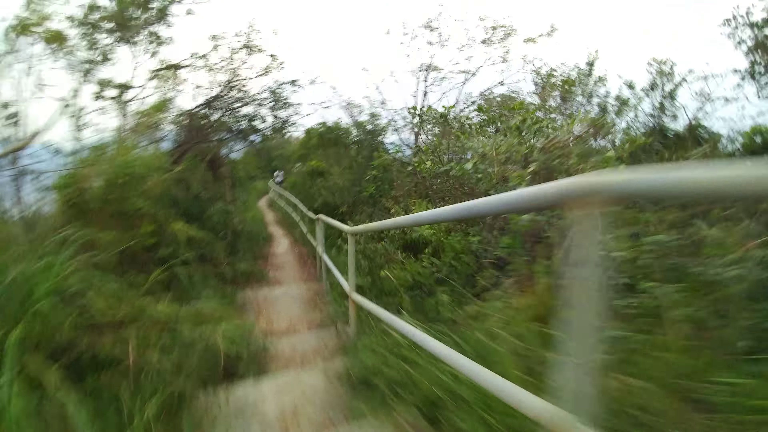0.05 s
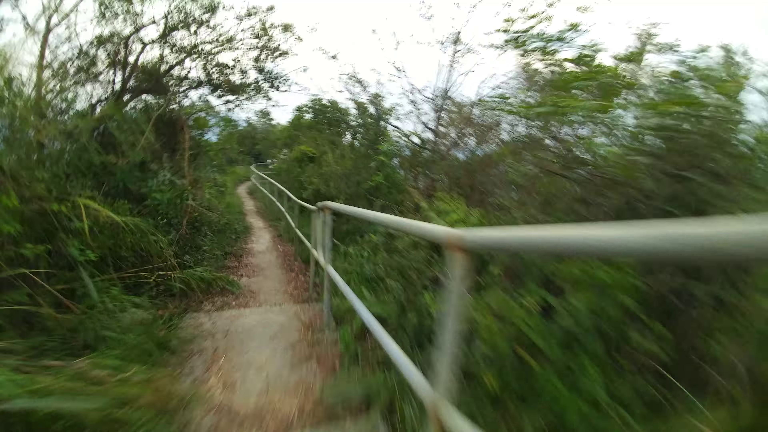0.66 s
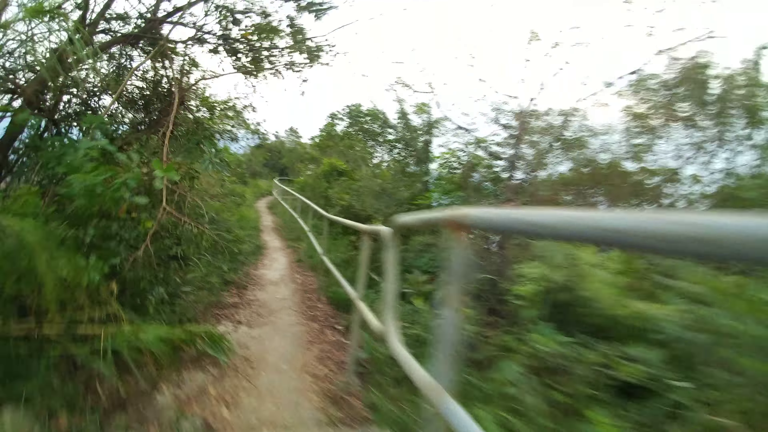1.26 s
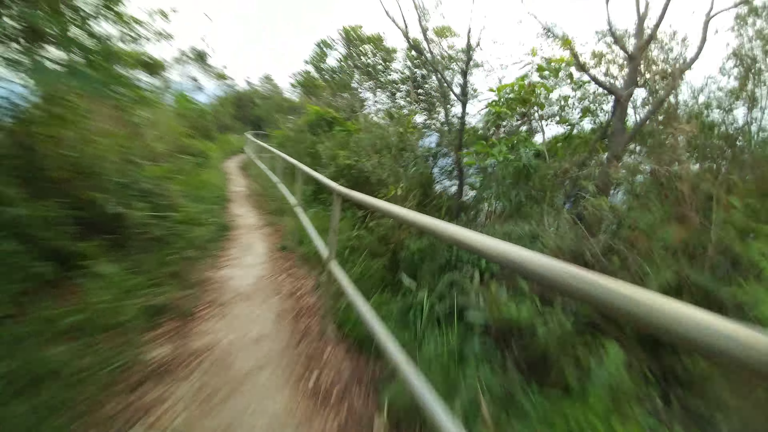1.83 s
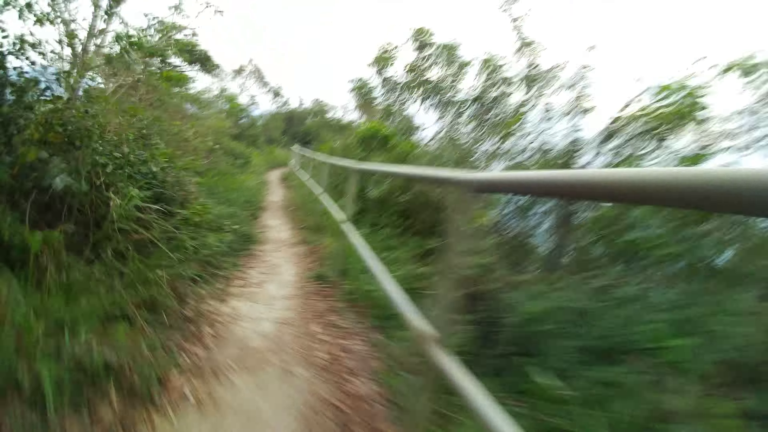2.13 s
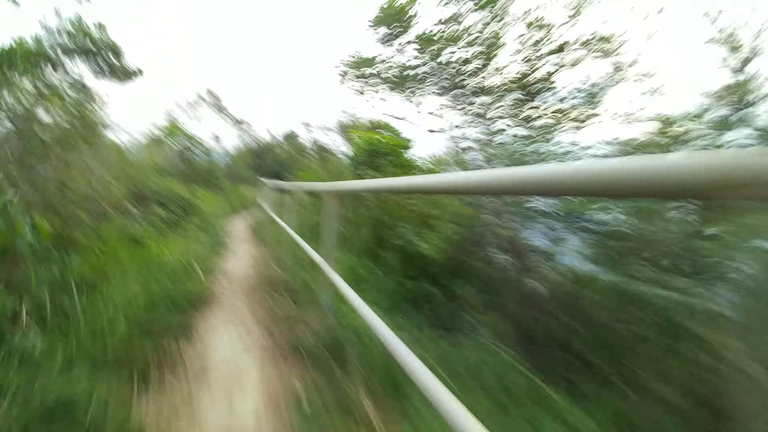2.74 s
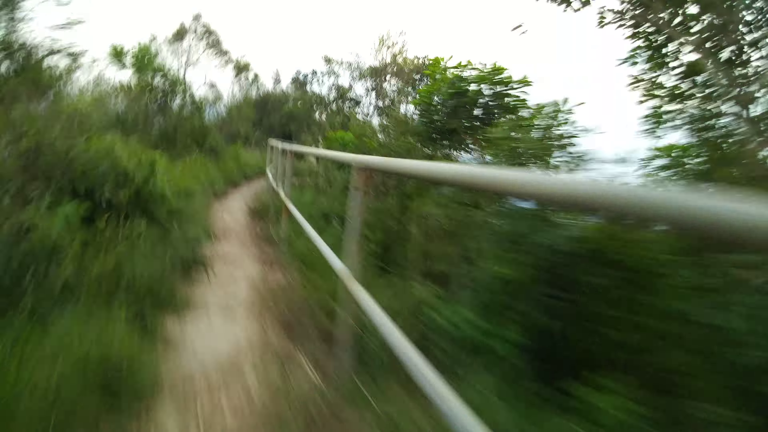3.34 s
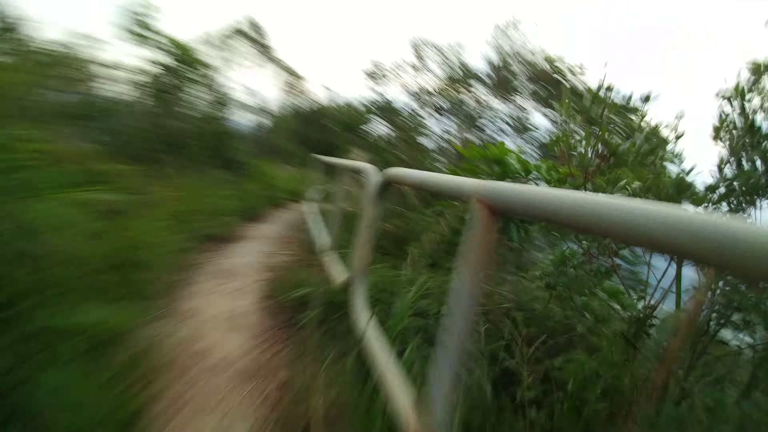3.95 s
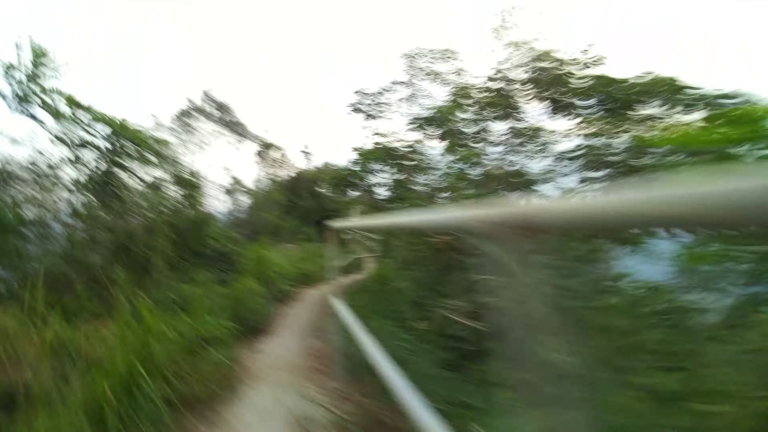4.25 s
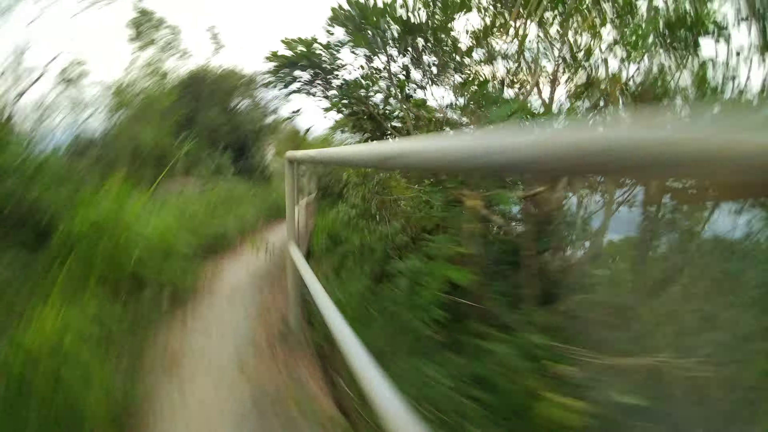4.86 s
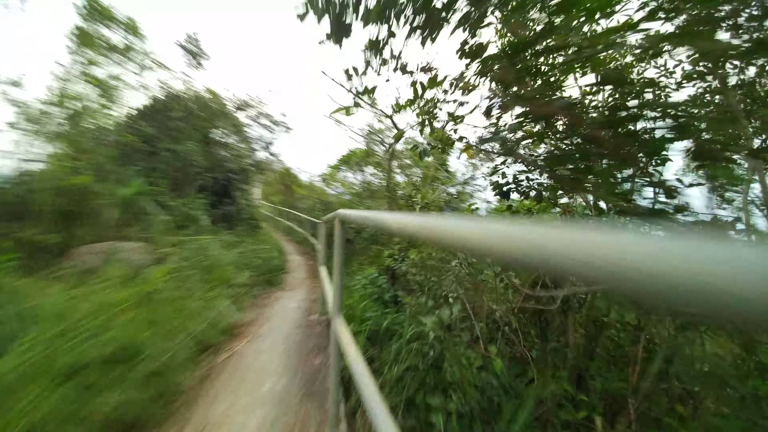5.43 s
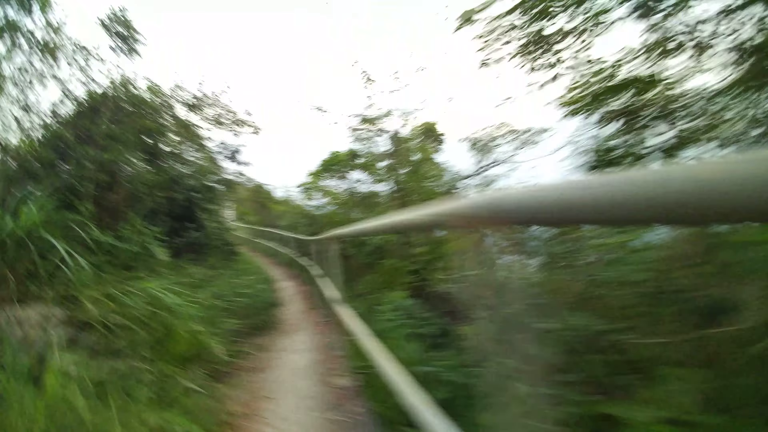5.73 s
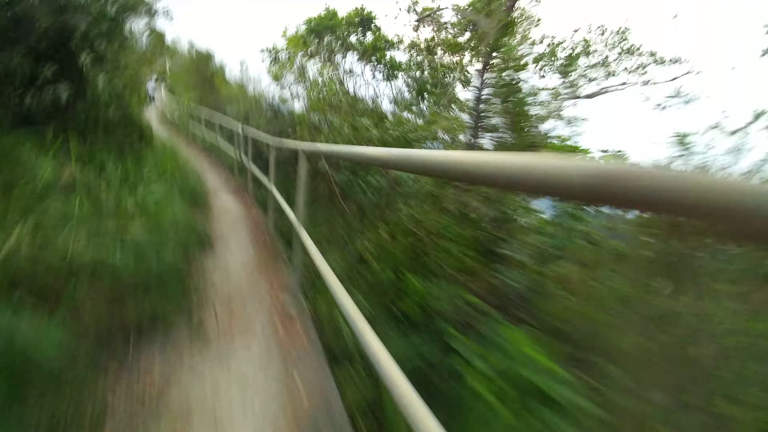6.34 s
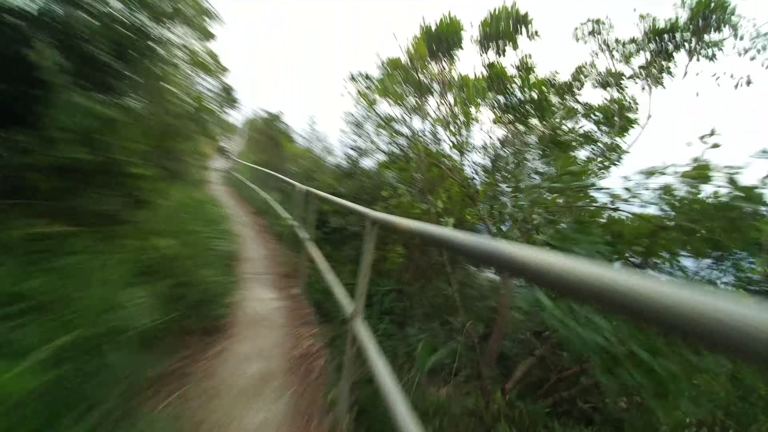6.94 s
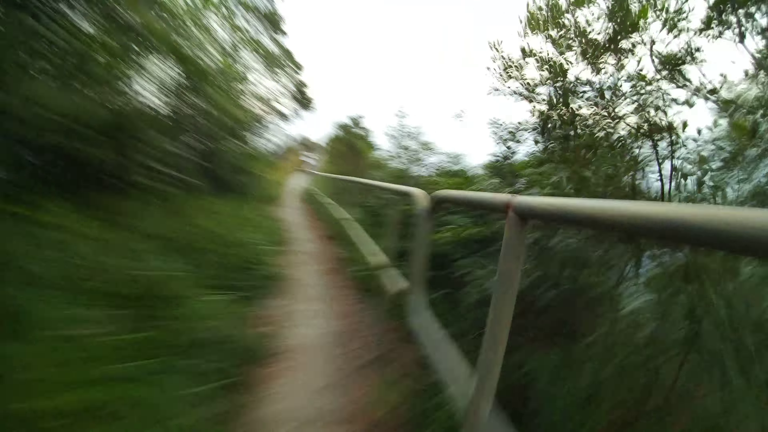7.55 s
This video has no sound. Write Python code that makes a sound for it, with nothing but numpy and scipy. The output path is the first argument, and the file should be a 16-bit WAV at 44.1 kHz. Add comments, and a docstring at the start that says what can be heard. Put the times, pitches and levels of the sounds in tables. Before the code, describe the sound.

Someone runs at a steady pace on a concrete path with stone steps. Heels and toes knock on the hard ground, grit and small pebbles crack underfoot, and a jacket swishes close on the left with every stride. A distant bird whistles once, very faintly, early on. Wind rumbles on the handheld microphone, hardest just after two seconds and again near the middle and the end, over a faint outdoor hiss.

```python
"""A concrete path with stone steps, heard from the stereo microphones of a camera in a runner's hand.
From the start heel and toe knock on the hard ground below, grit and pebbles crack, and a jacket
swishes close by the left microphone with every stride, over a faint outdoor hiss. After a second one
far bird whistles. Moving air buffets both microphones, hardest just after two seconds, and swells
again near the middle and near the end as the run goes on."""
import sys
import numpy as np
from scipy import signal
from scipy.fft import rfft, irfft
from scipy.io import wavfile
from scipy.ndimage import uniform_filter1d

SR = 44100
rng = np.random.default_rng(int(sys.argv[2]) if len(sys.argv) > 2 else 0)


def to_wav(s):
    """Save 16-bit WAV."""
    ch = np.atleast_2d(s).T  # columns
    pcm = np.round(np.clip(ch, -1, 1) * 32767)  # PCM
    wavfile.write(sys.argv[1], SR, pcm.astype(np.int16))


N = 339129
TIME = np.arange(N) / SR

# One row a stride; the arm swings past the left microphone as the foot pushes off:
# (time [s], swish level [dB], build-up [s], grit level [dB])
STRIDES = [(0.332, -35.5, 0.063, -43), (0.686, -34, 0.029, -22), (1.03, -47.5, 0.45, -21),
           (1.399, -39, 0.09, -49), (1.794, -38.5, 0.092, -51), (2.27, -37, 0.12, -15),
           (2.528, -38.5, 0.04, -32), (2.936, -39, 0.043, -15), (3.28, -35.5, 0.042, -29),
           (3.65, -38.5, 0.091, -13), (4.048, -39.5, 0.068, -28), (4.405, -41.5, 0.12, -19),
           (4.788, -38.5, 0.076, -16.5), (5.155, -37.5, 0.061, -22), (5.547, -42.5, 0.11, -19),
           (5.881, -41.5, 0.046, -27), (6.254, -44, 0.12, -15), (6.642, -38, 0.06, -19),
           (7.009, -39.5, 0.18, -27), (7.375, -36.5, 0.1, -16.5)]


def footfalls(knock_db=3.5, grit_db=-25, thud_db=-20, thud_hz=85, thud_s=0.014, slap_db=-15, firm_db=-15.5):
    """Each contact is a knock, the dull slap of the tread, a little grit and the runner's weight."""
    # heel and toe landing below the microphones: (time [s], level [dB], knock pitch [Hz])
    contacts = [(0.232, -18.5, 480), (0.261, -5.5, 656), (0.283, -21, 600), (0.428, -24, 720),
                (0.522, -19.5, 330), (0.62, -25, 740), (0.636, -14.5, 580), (0.688, -25, 620),
                (0.891, -16.5, 490), (1.033, -25, 770), (1.252, -8.5, 606), (1.392, -17.5, 510),
                (1.583, -20, 425), (1.706, -12.5, 550), (1.757, -21, 600), (2.152, -22, 550),
                (2.187, -5.5, 586), (2.434, -18, 640), (2.476, -13.5, 550), (2.527, -20, 730),
                (2.868, -17.5, 664), (3.138, -6, 508), (3.594, -12.5, 527), (3.762, -34, 514),
                (3.886, -13, 520), (3.941, -25, 580), (3.992, -20.5, 744), (4.062, -9.5, 807),
                (4.095, -27, 560), (4.298, -26, 587), (4.341, -14, 560), (4.401, -10, 706),
                (4.715, -12, 677), (4.794, -14, 896), (5.032, -31.5, 550), (5.08, -22, 496),
                (5.233, -33, 1000), (5.335, -29, 590), (5.464, -8.5, 556), (5.77, -19, 847),
                (5.813, -28, 580), (6.143, -34.5, 610), (6.201, -21, 490), (6.576, -9, 598),
                (6.815, -27, 664), (6.863, -8.5, 546), (7.016, -19, 534), (7.154, -26, 675),
                (7.226, -17.5, 505), (7.316, -25.5, 655), (7.376, -10.5, 702), (7.535, -20.5, 640)]
    # rubber flattening on the ground: (frequency [Hz], level [dB])
    tread_spectrum = [(200, -5.5), (850, -7), (1500, -29), (5000, -53)]
    out, t = np.zeros((2, N)), np.arange(SR // 10) / SR
    thud = amp(thud_db) * t / thud_s * np.exp(1 - t / thud_s) * np.cos(2 * np.pi * thud_hz * t)
    flatten = amp(slap_db) * burst(t, rise_s=0.0005, decay_s=0.009)
    for s, db, hz in contacts:
        tread = colour(wide_noise(len(t)), tread_spectrum)
        tread = unit(colour(tread, [(hz / 2, body_db(hz)), (hz, 0)]))
        slap = tread * flatten * amp(0.31 * db)  # light contacts are mostly slap, hard ones mostly knock
        sand = amp(grit_db) * grit(slide_db=-2, slide_s=0.022)
        add(out, s, amp(db) * (sand + thud) + slap)
        weight_db = 1.1 * (db - firm_db)  # steps harder than a firm one gain body
        add(out, s, amp(db + knock_db) * knock(hz, weight_db))
    return out


def knock(hz, weight_db=0, rise_s=0.002538, spread_db=4, detune=0.08):
    """The sole meets uneven ground rim first, then flat, and rings briefly, never twice alike. Peak 1."""
    # a sole ringing on concrete: (multiple of the pitch, level [dB], t60 [s])
    modes = [(0.48, -4, 0.014), (1, 3, 0.024), (1.45, 0, 0.013), (2.5, -4, 0.007)]
    arrival_s = 0.001 + np.array([[0], [0.00019]])  # the right microphone hears it just later
    t = np.arange(SR // 20) / SR - arrival_s
    roll_s = rng.uniform(0.00077, 0.003975)
    blows = []
    for delay in (0, roll_s):
        age = np.maximum(t - delay, 0)
        rings = []
        for ratio, db, t60 in modes:
            louder, sharper = rng.uniform(-1.61, 1, 2)
            tone = np.sin(2 * np.pi * hz * ratio * (1 + detune * sharper) * (age - rise_s))
            rings.append(amp(db + spread_db * louder - 60 * age / t60) * tone)
        ring = rings[0] * amp(body_db(hz) + weight_db) + sum(rings[1:])
        blows.append(ring * (1 - np.exp(-(age / rise_s) ** 3)))
    both = blows[0] + 0.5 * blows[1]
    return both / abs(both).max()


def body_db(hz, heel_hz=550, db_per_octave=-15):
    """A heel lands low and heavy; the higher tap of a toe has less body."""
    return db_per_octave * np.log2(hz / heel_hz)


def push_offs(push_db=-7):
    """Grit cracks under the sole once in every stride."""
    out = np.zeros((2, N))
    for s, _, _, db in STRIDES:
        add(out, s, amp(push_db + db) * grit(slide_db=-3, slide_s=0.019))
    return out


def grit(slide_db, slide_s, ticks_per_s=700):
    """Grit cracks while the sole presses hardest, then trails off in separate ticks as it slides."""
    # grit crushed on concrete: (frequency [Hz], level [dB])
    spectrum = [(200, -20), (800, 6.5), (1800, -5.5), (3200, -15.5), (7000, -26), (15000, -71)]
    t = np.arange(SR // 10) / SR
    crack = np.exp(-((t - 0.0035) / 0.0028) ** 2)
    slide = amp(slide_db) * burst(t, rise_s=0.0029, decay_s=slide_s)
    sand = wide_noise(len(t))
    ticks = sand * (rng.random(len(t)) < ticks_per_s / SR)
    return unit(colour(sand, spectrum)) * crack + unit(colour(ticks, spectrum)) * slide


def scuffs(rub, per_s=26, scuff_db=-34, spread_db=3, low_hz=480, high_hz=950):
    """Small taps of the soles, scattered left and right, stronger at the height of a stride."""
    effort = unit(rub ** 0.6)
    out = np.zeros((2, N))
    pitches = np.geomspace(low_hz, high_hz, num=8)
    for hz in pitches:
        tap = knock(hz)
        for at in np.flatnonzero(rng.random(N) < per_s / len(pitches) / SR):
            size, lean = np.clip(rng.standard_normal(2), -2, 2) / [1, np.sqrt(2)]
            pan = np.array([[1 + lean], [1 - lean]])
            add(out, at / SR, amp(scuff_db + spread_db * size) * effort[at] * pan * tap)
    return out


def pebbles(left_db=-3, right_db=-6, bounces_per_s=450, chatter_s=0.012):
    """A pebble is struck sharply, then chatters against the concrete, ringing very briefly."""
    # loose pebbles underfoot: (time [s], level [dB], pitch [Hz])
    strikes = [(0.265, -3.5, 1420), (0.689, -5, 1210), (1.418, -19, 1960), (1.455, -12.5, 1280),
               (1.83, -18, 2200), (1.854, -20, 3000), (2.036, -17.5, 1450), (2.951, -13, 1370),
               (3.284, -0.5, 1540), (4.041, -12.5, 1080), (4.4, -11, 1200), (4.773, -8.5, 1720),
               (5.372, -19, 2350), (6.256, -5.5, 2610), (7.352, -12, 1260)]
    # a pebble's ring: (multiple of the pitch, level [dB], t60 [s])
    modes = [(.62, 7.5, 0.013), (1, 15, 0.009), (1.42, -6.5, 0.024), (2.3, -8, 0.0063)]
    out, t = np.zeros((2, N)), np.arange(SR // 20) / SR
    for s, db, hz in strikes:
        ring = sum(amp(mode_db - 60 * t / t60) * np.sin(2 * np.pi * hz * ratio * t)
                   for ratio, mode_db, t60 in modes)
        bounces = (rng.random((2, len(t))) < bounces_per_s / SR) * rng.uniform(-1.36, 1, (2, len(t)))
        hits = (t == 0) + bounces * np.exp(-t / chatter_s)
        click = signal.fftconvolve(hits, ring[None], axes=1) / abs(ring).max()
        add(out, s, amp(db) * amp([[left_db], [right_db]]) * click)
    return out


def crunch(crunch_db=2, roll_s=0.11):
    """Small stones grind at the height of each stride and roll on briefly."""
    effort = sum(amp(db) * swell(s, min(build_s, roll_s), roll_s) for s, db, build_s, _ in STRIDES)
    return amp(crunch_db) * effort * grains(count=55, spread_db=5, low_hz=700, high_hz=2234, cycles=3.2)


def rock_echo(feet, echo_db=-17, first_s=0.0057, t60=0.13):
    """Short, weak scatter from the steps and boulders beside the path."""
    t = np.arange(SR // 4) / SR
    taps = rng.standard_normal((2, len(t))) * (t > first_s) * amp(-60 * t / t60)
    return amp(echo_db) * signal.fftconvolve(feet, taps / np.linalg.norm(taps[0]), axes=1)[:, :N]


def jacket(rub, cloth_db=8.5, pop_db=-2):
    """Close by the left microphone, cloth slides with a fizz, slips in jerks and pops in tiny creases."""
    # sliding cloth: (frequency [Hz], level [dB])
    spectrum = [(200, -55), (350, -13), (600, -1), (1000, -8.5), (1600, -5), (3200, -7), (7500, -11),
                (9000, -16.5), (10500, -16.5), (16000, -31)]
    # the right microphone faces away and hears it duller: (frequency [Hz], gain [dB])
    off_axis = [(900, 14), (2000, -5.5), (4000, -10), (9000, -36), (14000, -17)]
    creases = grains(count=170, spread_db=4, low_hz=1330, high_hz=13500, cycles=1.3)
    friction = rng.standard_normal((2, N)) + amp(pop_db) * creases
    fizz = unit(shifting_folds(colour(friction, spectrum)))
    left, right = fizz * amp(cloth_db) * rub * slips()
    return np.array([left, colour(right, off_axis)])


def rubbing(rest_db=-60, fade_s=0.087, rustle_rise_s=0.0012, rustle_fall_s=0.042):
    """The jacket's rubbing as a gain: a swish that builds and fades each stride, and brief rustles."""
    # the fading swish of an opening stride, then quick flicks of the jacket: (time [s], level [dB])
    rustles = [(0.0, -42), (2.834, -43.5), (3.172, -39.5), (3.468, -45), (4.177, -46.5), (4.6, -39.5),
               (4.931, -46)]
    power = np.full(N, amp(rest_db) ** 2)
    for s, db, build_s, _ in STRIDES:
        power += (amp(db) * swell(s, build_s, fade_s)) ** 2
    t = np.arange(SR // 4) / SR
    rustle = np.minimum(t / rustle_rise_s, np.exp((rustle_rise_s - t) / rustle_fall_s))
    for s, db in rustles:
        add(power, s, (amp(db) * rustle) ** 2)
    return np.sqrt(power)


def shifting_folds(cloth, depth_db=2.5):
    """As the folds shift, resonances about a kilohertz wide come and go within hundredths of a second."""
    spectra = signal.stft(cloth)[-1]
    patches = uniform_filter1d(rng.standard_normal(spectra.shape[1:]), size=6, axis=0)  # across pitch
    patches = uniform_filter1d(patches, size=9)  # across time
    return signal.istft(spectra * amp(depth_db * unit(patches)))[-1][:, :N]


def slips(per_s=120, decay_s=0.011, steady=0.46):
    """Stick and slip: sudden bursts that die away, on top of a steady slide. Rms 1."""
    jolts = (rng.random(N) < per_s / SR) * rng.random(N)
    return unit(steady + signal.lfilter([1], [1, -np.exp(-1 / (decay_s * SR))], jolts))


def scratches(right_db=-5):
    """Short, grainy rubs right at the microphones, as of a hand shifting on the camera."""
    # handling noise: (time [s], level [dB], length [s])
    rubs = [(0.533, -31, 0.0057), (1.979, -30, 0.011), (2.434, -30.5, 0.051), (3.168, -28.5, 0.006),
            (3.887, -33.5, 0.089), (5.755, -31, 0.053), (6.863, -29.5, 0.013), (6.939, -29.5, 0.0097)]
    # a scratch, reaching far into the treble: (frequency [Hz], level [dB])
    spectrum = [(500, 30), (2000, 9), (7500, 13), (16000, 0.5)]
    out, t = np.zeros((2, N)), np.arange(SR // 10) / SR
    for s, db, length_s in rubs:
        noise = rng.standard_normal((2, len(t)))
        fade = 1 - np.minimum(t / length_s, 1) ** 2
        add(out, s, amp(db) * unit(colour(noise * abs(noise), spectrum)) * fade)
    return out * amp([[0], [right_db]])


def wind(left_db=7.5, right_db=7.0, lump_db=3, lump_hz=25):
    """Lumpy low turbulence, different at each microphone."""
    # strength of the air on the microphones: (time [s], level [dB])
    gusts = [(0.21, -46), (0.28, -29), (0.38, -46), (0.7, -35), (0.77, -42.5), (1.18, -44), (1.3, -37),
             (2.12, -36), (2.16, -21.5), (2.25, -31), (3.45, -32.5), (3.64, -26), (4.24, -33.5),
             (6.02, -40), (6.9, -28.5), (7.12, -32)]
    # the rumble of buffeting: (frequency [Hz], level [dB])
    spectrum = [(33, -36), (48, 1), (66, 2), (110, -4), (200, -13.5), (400, -23.5), (1200, -64)]
    eddies = [rng.standard_normal(N) * amp(lump_db * np.tanh(wander(lump_hz))) for _ in range(2)]
    rumble = np.array([unit(colour(side, spectrum)) for side in eddies])
    gust_db = np.interp(TIME, *np.transpose(gusts))
    return rumble * amp([[left_db], [right_db]]) * amp(gust_db)


def outdoors(air_db=-45):
    """Distant wash that swells and lulls, with a thin band of insect-like hiss."""
    # the open air around the path: (frequency [Hz], level [dB])
    spectrum = [(100, 10), (380, 4), (600, 15.5), (1200, -7.5), (2500, -59), (4000, -26), (4900, -8),
                (6000, -29), (16000, -21)]
    wash = unit(colour(wide_noise(N), spectrum))
    return amp(air_db + 2 * np.tanh(wander(5.8))) * wash


def bird(bird_db=-60, start_s=1.07, end_s=1.4, top_hz=3140, sag_hz=172):
    """One far whistle that arches and flutters faintly."""
    position = 2 * (TIME - start_s) / (end_s - start_s) - 1  # -1 to 1 across the call
    hz = top_hz - sag_hz * position ** 4 * (abs(position) < 1) + 10 * wander(60)
    return amp(bird_db) * np.sin(2 * np.pi * np.cumsum(hz) / SR) * np.maximum(1 - position ** 4, 0)


def grains(count, spread_db, low_hz, high_hz, cycles):
    """Tiny pops, count at each of 24 pitches, unlike at the two microphones; a few are large. Rms 1."""
    out = np.zeros((2, N))
    for hz in np.geomspace(low_hz, high_hz, num=24):
        turns = hz * np.arange(SR // 40) / SR
        pop = np.sqrt(hz) * unit(np.sin(2 * np.pi * turns) * np.exp(-turns / cycles))
        for when, size, side in rng.random((count, 3)):
            gain = amp(-spread_db * np.log(size + 0.05))
            add(out, when * N / SR, gain * np.outer([1, np.sqrt(2) * np.cos(np.pi * side)], pop))
    return unit(out)


def swell(s, build_s, fade_s, range_db=20):
    """A stride's effort: it builds evenly in dB to its peak at time s, then tails away."""
    before = (s - TIME) / build_s
    after = np.minimum(abs((TIME - s) / fade_s) ** 1.22, 10)
    return amp(-range_db * np.where(TIME < s, before, after))


def burst(t, rise_s, decay_s):
    """A straight rise under an exponential decay."""
    return np.minimum(t / rise_s, 1) * np.exp(-t / decay_s)


def wide_noise(samples):
    """White noise, half of its power common to both microphones."""
    noise = rng.standard_normal((3, samples))
    return noise[0] + noise[1:]


def wander(hz):
    """Smooth random drift of rms 1 that changes about hz times a second."""
    f = np.fft.rfftfreq(N, 1 / SR)
    return unit(irfft(rfft(rng.standard_normal(N)) * np.exp(-(f / hz) ** 2), N))


def colour(x, spectrum):
    """Filters by a curve of (frequency [Hz], gain [dB]) points."""
    hz, db = np.transpose(spectrum)
    f = np.fft.rfftfreq(x.shape[-1], 1 / SR)
    return irfft(rfft(x) * amp(np.interp(np.log(f + 1), np.log(hz), db)), x.shape[-1])


def add(mix, s, sound):
    """Mixes a sound in at time s."""
    part = mix[..., max(round(s * SR), 0):][..., :sound.shape[-1]]
    part += sound[..., :part.shape[-1]]


def amp(db):
    """Decibels to gain."""
    return 10 ** (np.asarray(db) / 20)


def unit(x):
    """Scales to rms 1."""
    return x / np.sqrt(np.mean(x ** 2) + 1e-20)


def scene():
    """Feet and their echo below; jacket, hand and wind at the microphones; the outdoors far behind."""
    rub = rubbing()
    feet = footfalls() + push_offs() + scuffs(rub) + pebbles()
    return feet + rock_echo(feet) + jacket(rub) + crunch() + scratches() + wind() + outdoors() + bird()


def record(dry):
    """The recorder's band limit."""
    edge_hz = 16100
    low_pass = signal.firwin(511, edge_hz, window=("kaiser", 9), fs=SR)
    return signal.oaconvolve(dry, low_pass[None], "same")


dry = scene()
out = record(dry)
to_wav(out)
```